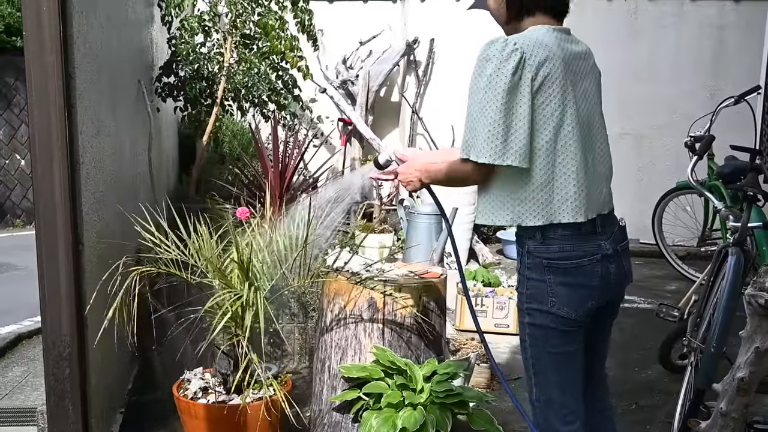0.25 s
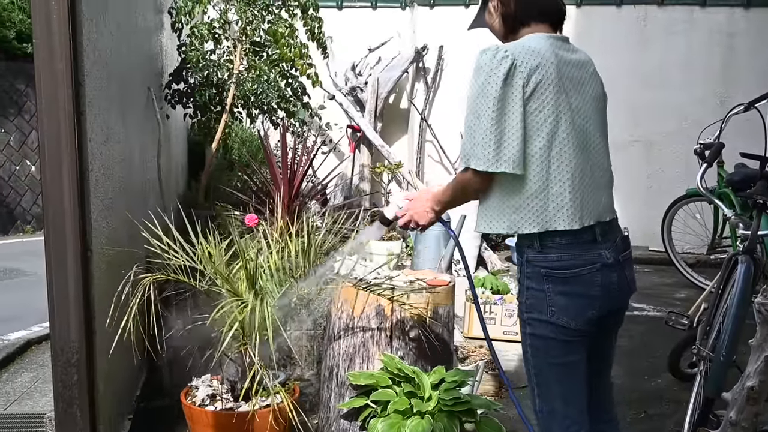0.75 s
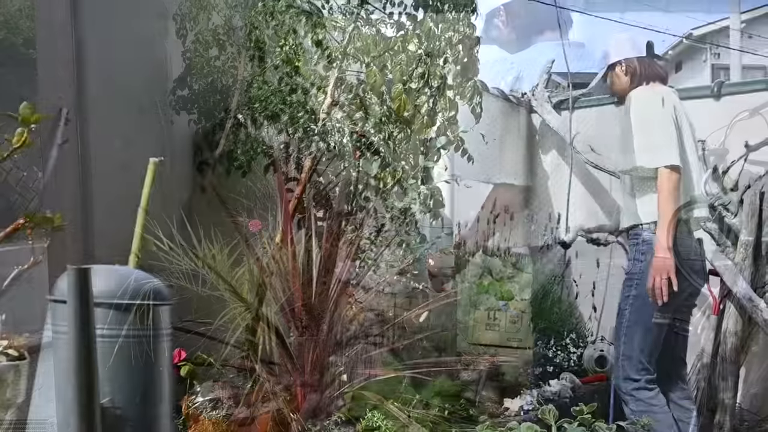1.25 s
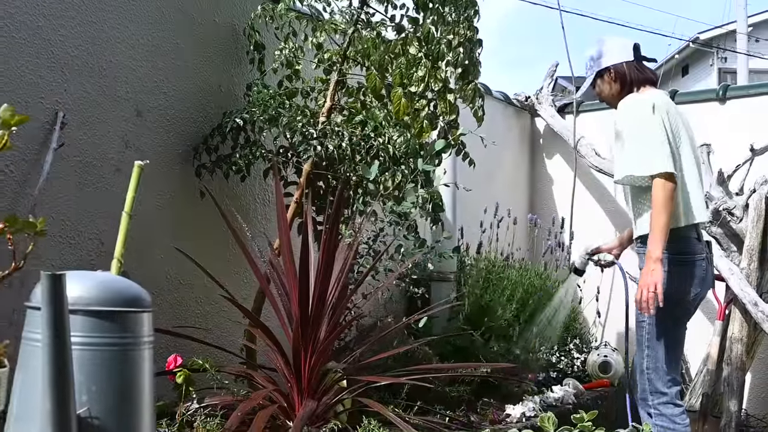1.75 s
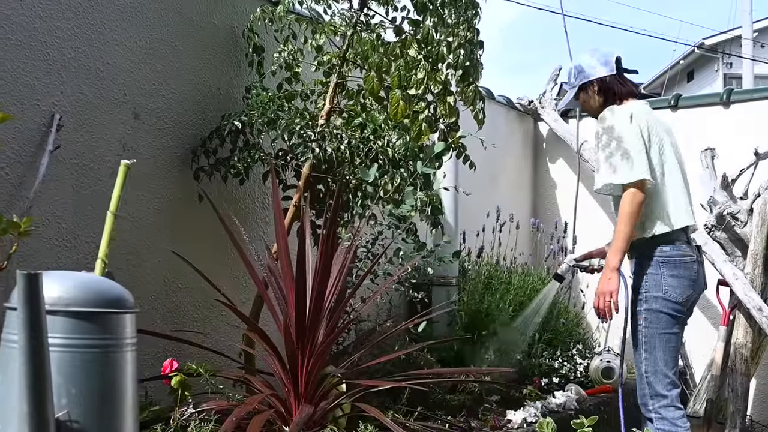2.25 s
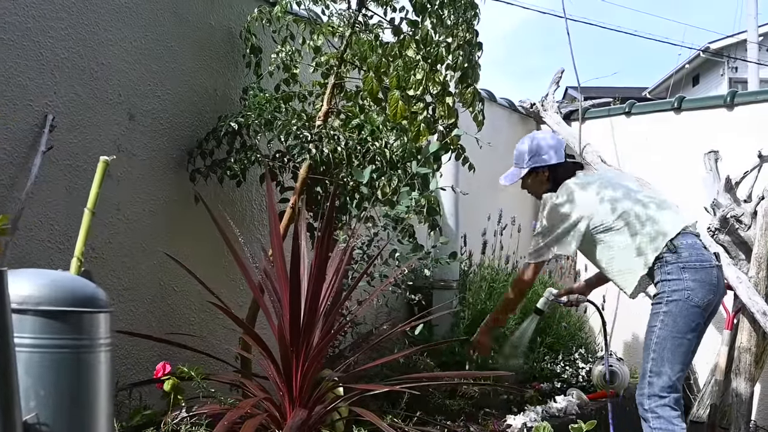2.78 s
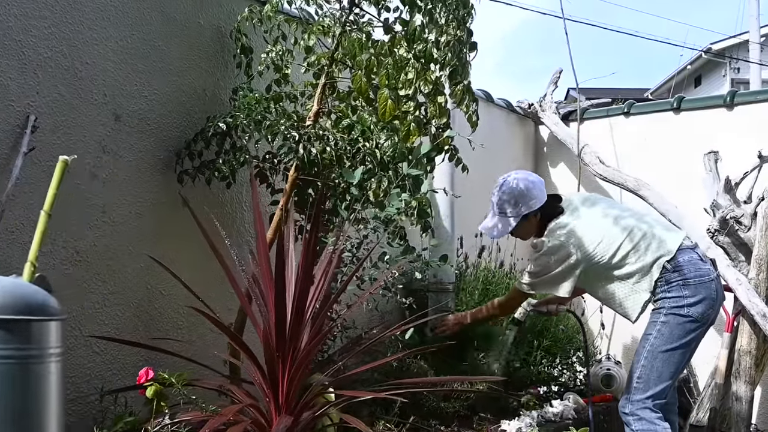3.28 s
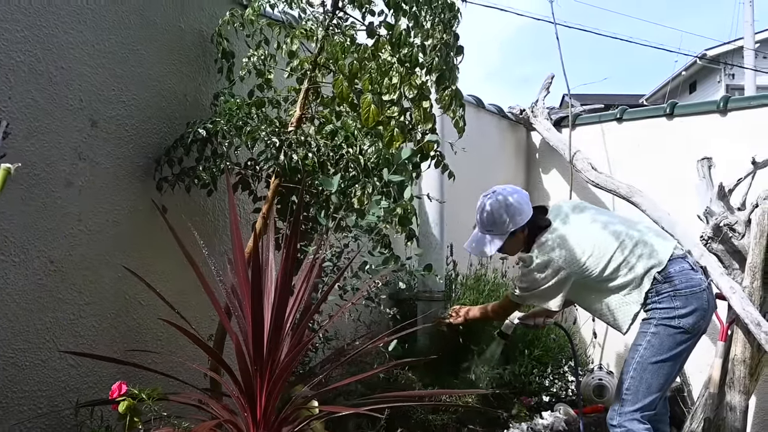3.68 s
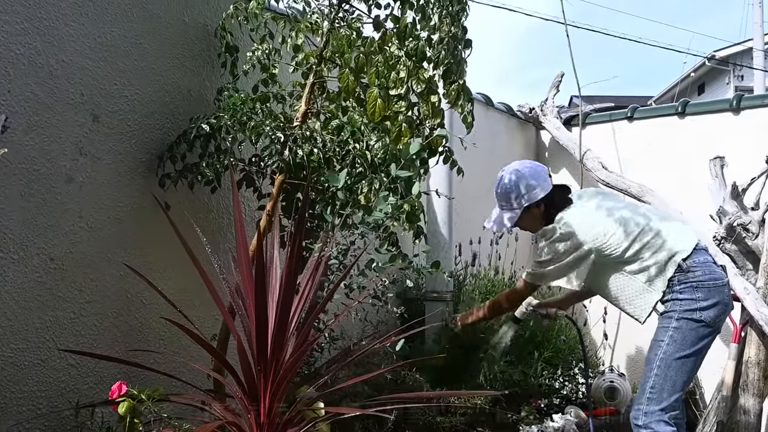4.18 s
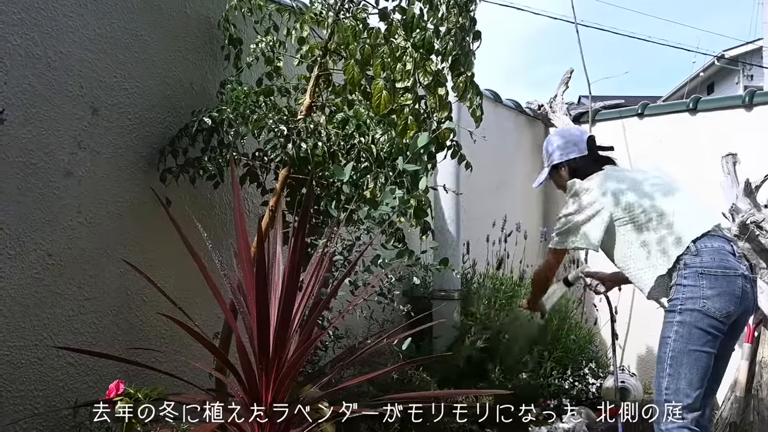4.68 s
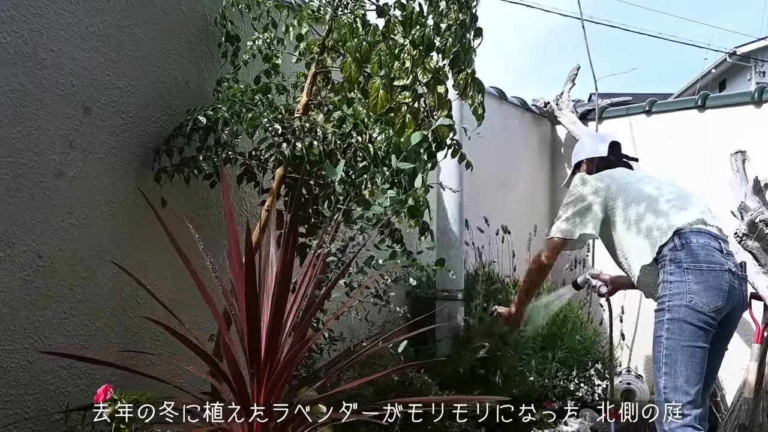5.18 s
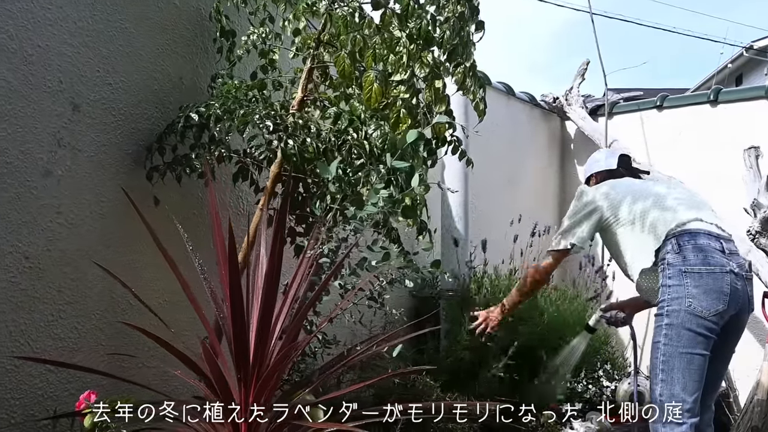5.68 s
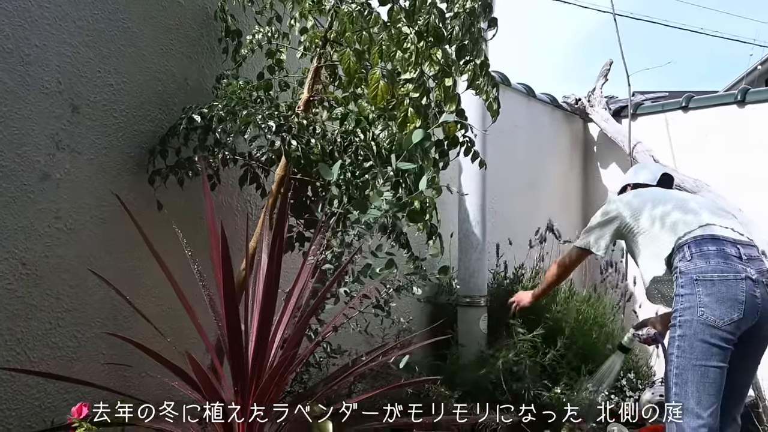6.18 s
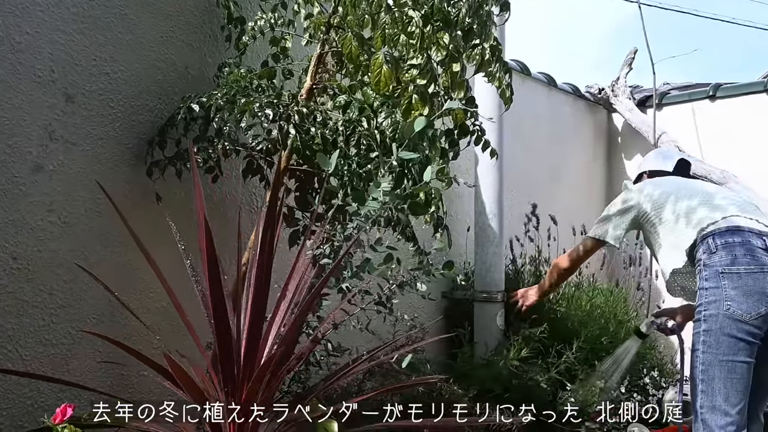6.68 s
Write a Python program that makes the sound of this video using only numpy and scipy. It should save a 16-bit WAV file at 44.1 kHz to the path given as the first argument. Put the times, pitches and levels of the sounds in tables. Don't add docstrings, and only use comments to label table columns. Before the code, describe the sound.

A garden hose sprays leaves and soil with bright, wavering hiss, while the nozzle clicks and sputters and the hose softly bumps a hollow pipe.

```python
import sys
import numpy as np
from scipy import signal
from scipy.fft import rfft, irfft
from scipy.io import wavfile
from scipy.ndimage import uniform_filter1d

SR = 44100
rng = np.random.default_rng(int(sys.argv[2]) if len(sys.argv) > 2 else 0)


def gain_from_decibels(decibels):
    exponent = np.asarray(decibels, float) / 20
    return 10 ** exponent


def generate_wav(signal):
    frames = np.transpose(np.atleast_2d(signal))
    scaled = np.clip(frames, -1, 1) * 32767
    pcm = np.round(scaled).astype(np.int16)
    wavfile.write(sys.argv[1], SR, pcm)


N = 306348
TIME = np.arange(N) / SR
BINS_HZ = np.maximum(np.fft.rfftfreq(N, 1 / SR), 1)

# (frequency [Hz], density [dB per Hz])
SPRAY_COLOUR = [(180, -47), (300, -19), (526, -12), (757, -8), (954, -6), (1570, -5.5), (2150, -4.5),
                (3040, -3.5), (4900, -2), (7920, 0), (10700, -9), (13700, -6.5), (15600, -13)]
# (time [s], level [dB])
SPURT = [
    (.33, -72),
    (.385, -49),
    (.43, -41),
    (.53, -41),
    (.585, -39.5),
    (.605, -45),
    (.63, -67),
]


def unit(x):
    return x / np.sqrt(np.mean(x ** 2))


def curve(rows):
    s, *columns = np.transpose(rows)
    return [np.interp(TIME, s, c) for c in columns]


def colour(points):
    hz, db = np.transpose(points)
    return gain_from_decibels(np.interp(np.log(BINS_HZ), np.log(hz), db))


def shape(x, gain):
    return irfft(rfft(x) * gain, N)


def walk(rate_hz):
    size = int(SR / rate_hz)
    steps = np.repeat(rng.standard_normal(N // size + 1), size)
    steps = uniform_filter1d(uniform_filter1d(steps, size), size)[:N]
    return unit(steps - uniform_filter1d(steps, 3 * size))


def burst(t60_ms, rise_ms=.12):
    ms = np.arange(SR // 8) / SR * 1e3
    envelope = (1 - np.exp(-ms / rise_ms)) * gain_from_decibels(-60 * ms / t60_ms)
    return rng.standard_normal(len(ms)) * envelope / 2


def add(out, s, x):
    i = int(s * SR)
    out[i:i + len(x)] += x[:N - i]


def band(x, hz, width_hz):
    lo = max(hz - width_hz / 2, hz / 4)
    hi = min(hz + width_hz / 2, 20000)
    sos = signal.butter(2, (lo, hi), "band", fs=SR, output="sos")
    return signal.sosfilt(sos, x) * np.sqrt(SR / 2 / (hi - lo))


def layer_levels():
    # (time [s], flow [dB], coarseness of the splash [dB])
    jet = [(0, -40, -8.5), (.2, -46, -5.5), (.76, -46, -6), (.99, -44, -1.5), (1.05, -39.5, 3.5),
           (1.2, -41, 3), (1.5, -46.5, 0.5), (2.5, -45, -1), (2.75, -39.5, -2), (3.22, -42, 4),
           (3.8, -40.5, -1.5), (4.22, -42.5, -4), (4.7, -49.5, 0.5), (4.77, -55, -2), (5.0, -59.5, 1),
           (5.53, -53.5, -4), (5.66, -43.5, -3), (6.95, -40.5, -5)]
    # (middle [s], length [s], change [dB], coarser [dB])
    swings = [(0.65, 0.067, -1.5, 0), (0.847, 0.019, 5, 3), (.9, 0.044, 0, 1), (0.998, 0.037, 3, -7.5),
              (1.424, 0.055, 2.5, -0.5), (1.52, 0.061, -1.5, -2), (1.577, 0.054, 1.5, -1),
              (1.735, 0.068, -5, 0.5), (2.045, 0.095, -5, 0.5), (2.41, 0.12, -2, 0.5), (2.557, .04, 0.5, 3),
              (3.4, 0.093, -2, 1.5), (4.395, 0.2, -2.5, -1.5), (4.58, 0.11, 1.5, 1),
              (4.95, 0.054, -1.5, -0.5), (5.77, 0.154, 0.5, -0.5), (5.992, .05, 0, -1.5),
              (6.47, 0.044, -1, 1.5), (6.69, 0.39, 2, -5.5), (6.833, 0.11, -2, 1.5), (6.921, 0.14, -1, 5)]
    # (level [dB], share of flow, of coarseness, of swings [ratios], lift by the spurt [dB])
    layers = [
        (-56.5, 0.17, 0.34, 0.35, -6),
        (-45, 0.91, 0.92, 1.66, 1),
        (-46.5, 0.93, 0.23, 1.53, 9),
        (-49, 0.72, -0.041, 1, 11),
    ]
    usual_flow_db = -45
    paving_db, paving_until_s, paving_fade_s = 6.5, 1.78, 0.051
    flow, coarse = curve(jet)
    swung = 0
    for s, length_s, db, coarser_db in swings:
        swing = np.exp(-(2 * (TIME - s) / length_s) ** 4)
        swung = swung + db * swing
        coarse = coarse + coarser_db * swing
    air = np.clip((curve(SPURT)[0] + 68) / 30, 0, 1)
    levels = []
    for db, by_flow, by_coarse, by_swing, lift_db in layers:
        level = db + by_flow * (flow - usual_flow_db) + by_coarse * coarse
        levels.append(level + by_swing * swung + lift_db * air)
    levels[0] = levels[0] + paving_db / (1 + np.exp((TIME - paving_until_s) / paving_fade_s))
    return levels


def drops(rate_hz, spread_db, lone, flicker_db, ring_ms):
    chance = rng.random((2, N))
    size = np.minimum(-np.log(1 - chance[1]), 3)
    strikes = (chance[0] < rate_hz / SR) * gain_from_decibels(spread_db * size)
    puffs = signal.lfilter([1], [1, -np.exp(-1e3 / ring_ms / SR)], strikes) * rng.standard_normal(N)
    lone = np.clip(lone, 0, 1)
    blur = rng.standard_normal(N)
    return gain_from_decibels(flicker_db * walk(55)) * (np.sqrt(lone) * unit(puffs) + np.sqrt(1 - lone) * blur)


def spray(levels):
    # (rate [drops/s], size spread [dB], share of lone drops [0-1], flicker [dB], ring [ms])
    drop_sizes = [
        (900, -5, 0.06, 0.5, 3.9),
        (2050, 4.5, 0.24, 0.5, 2.3),
        (3030, 14, 0.14, 0.53, 2.1),
        (4000, 4, 0.17, 0.5, 0.79),
    ]
    edges_hz = (450, 1500, 4000, 10000, 19000)
    shake = gain_from_decibels(0.27 * walk(45))
    out = 0
    for db, size, lo, hi in zip(levels, drop_sizes, edges_hz, edges_hz[1:]):
        window = 1 / np.sqrt((1 + (lo / BINS_HZ) ** 6) * (1 + (BINS_HZ / hi) ** 6))
        out = out + gain_from_decibels(db) * unit(shape(drops(*size), colour(SPRAY_COLOUR) * window))
    return shake * out


def bubbles(splash_db):
    count, low_hz, high_hz, cycles, level_db = 3200, 600, 5920, 24, -9.5
    out = np.zeros(N)
    t = np.arange(1500) / SR
    for when, pitch, big in rng.random((count, 3)):
        hz = low_hz * (high_hz / low_hz) ** pitch
        age = t * hz / cycles
        chirp = np.sin(2 * np.pi * hz * t * (1 + 0.044 * age))
        add(out, when * N / SR, gain_from_decibels(3.7 * big) * np.sqrt(hz) * chirp * age * np.exp(-3 * age))
    return gain_from_decibels(splash_db + level_db) * unit(shape(out, colour(SPRAY_COLOUR)))


def drummed(rows, sharpness):
    out = np.zeros(N)
    for start, end, hz, db in rows:
        size = int((end - start) * SR)
        noise = rng.standard_normal(size + 2000)
        drum = signal.lfilter(*signal.iirpeak(hz, sharpness, SR), noise)[-size:]
        drum = drum / np.abs(signal.hilbert(drum)) ** .4
        add(out, start, gain_from_decibels(db) * unit(drum) * signal.windows.tukey(size, .6))
    return out


def hollow_rings():
    # (from [s], to [s], pitch [Hz], level [dB])
    hollows = [(.42, .44, 2700, -45), (.435, .5, 1980, -44), (.47, 0.577, 2080, -42),
               (.42, .445, 2670, -51.5), (.525, .55, 2680, -46), (0.34, 0.56, 2400, -44.5),
               (.525, .55, 1470, -47), (.588, .612, 950, -48.5), (.618, .636, 870, -52),
               (1.015, 1.028, 1600, -41), (1.03, 1.075, 1610, -38.5), (1.092, 1.118, 2600, -33.5),
               (1.2, 1.41, 2520, -45), (1.3, 1.47, 3770, -48), (1.15, 1.49, 1490, -52),
               (2.9, 2.97, 950, -49.5), (2.92, 2.96, 590, -55), (2.99, 3.015, 1160, -50),
               (2.95, 3.48, 1880, -51), (2.6, 3.4, 2600, -56), (3.15, 3.42, 1075, -53),
               (3.2, 3.397, 535, -61), (3.47, 3.72, 2940, -47.5), (3.44, 3.88, 3170, -50),
               (3.42, 3.8, 2620, -52), (3.43, 3.53, 3550, -50), (3.7, 3.95, 2900, -53),
               (3.75, 4.1, 2250, -57), (3.45, 3.993, 2088, -54), (4.61, 4.63, 1300, -45),
               (4.545, 4.58, 690, -50.5), (4.64, 4.67, 2100, -51), (5.84, 5.92, 1520, -54),
               (5.3, 7, 8000, -54), (5.63, 5.8, 7200, -48.5), (2.255, 2.275, 1900, -52),
               (6.88, 6.94, 2050, -52)]
    return drummed(hollows, 19)


def flat_slaps():
    # (from [s], to [s], centre [Hz], level [dB])
    flats = [(.098, .104, 1400, -39.5), (0.0102, .8, 330, -67), (.752, 1.168, 370, -58),
             (.838, .865, 2900, -45), (.872, .915, 9800, -40.5), (1.02, 1.13, 1900, -39.5),
             (1.01, 1.15, 2750, -42), (1.03, 1.12, 1300, -49), (1.4, 1.445, 250, -56),
             (0.97, 1.93, 294, -66), (1.7, 1.816, 1340, -53.5), (2.27, 2.404, 270, -60),
             (3.1, 3.36, 3100, -43), (1.6, 1.718, 1000, -53), (4.43, 4.53, 1010, -52.5),
             (4.51, 4.57, 1450, -46), (4.57, 4.62, 1500, -50), (.41, 0.616, 2560, -44),
             (4.635, 4.675, 2000, -47), (4.63, 4.67, 900, -50.5), (5.62, 5.9, 4500, -48),
             (2.2, 2.27, 2300, -49), (6.0, 6.35, 4500, -49), (.84, .9, 1540, -49), (6.86, 6.95, 5300, -48)]
    return drummed(flats, 3)


def town_hums():
    # (from [s], to [s], pitch [Hz], level [dB])
    town_lines = [
        (.12, .55, 420, -65),
        (0, .8, 724, -63),
        (0, .95, 1380, -59),
    ]
    return drummed(town_lines, 30)


def spurt():
    # (frequency [Hz], width [Hz], level [dB])
    modes = [(2200, 500, -9), (2700, 150, -10), (3400, 300, -8), (4240, 180, -4), (5270, 130, 5),
             (6050, 200, -2), (6700, 180, -1), (7750, 350, 0), (8770, 220, 0), (9700, 300, -4),
             (10700, 500, -8), (11800, 400, -5), (13000, 800, -6)]
    gain = 0
    for k, (hz, width_hz, db) in enumerate(modes):
        gain = gain + (-1) ** k * gain_from_decibels(db) / (1 + 2j * (BINS_HZ - hz) / width_hz)
    return gain_from_decibels(curve(SPURT)[0] + 1.5 * walk(54)) * unit(shape(rng.standard_normal(N), gain))


def clicks():
    # (time [s], peak [dB], ring [Hz], t60 [ms])
    ticks = [(.001, -28, 5370, 30), (.021, -33, 12500, 10), (0.0325, -19, 5900, 23),
             (0.0328, -17, 7930, 22), (.059, -36, 13500, 10), (0.0745, -26.5, 3800, 8.1),
             (.0752, -27, 8700, 10), (0.077, -28, 5640, 10), (0.098, -25, 8140, 12), (.1, -34.5, 5560, 12),
             (.114, -30, 10500, 12), (.127, -34, 7800, 10), (.162, -34.5, 12900, 10), (.73, -35, 11000, 14),
             (.778, -32, 5980, 14), (0.8053, -27, 10050, 12), (0.8402, -29, 2320, 13),
             (.8415, -32, 7000, 40), (0.843, -29, 2733, 30), (.851, -30, 2200, 30), (.856, -33, 1700, 30),
             (.8745, -22, 9550, 14), (.879, -28, 9000, 20), (.893, -27, 8500, 20), (.942, -29.5, 4750, 16),
             (.9805, -12, 6770, 13), (0.984, -22, 6500, 17), (1.013, -29, 12500, 10), (1.081, -16, 4070, 9),
             (1.0812, -13, 6770, 13), (1.0857, -21, 6220, 9), (1.1229, -15, 2930, 8),
             (1.1237, -15, 4200, 8), (1.1303, -15, 4300, 8.4), (1.136, -22, 4000, 13),
             (1.147, -24, 7160, 10), (1.357, -26, 8200, 25), (1.465, -37, 12200, 30),
             (1.527, -37, 11000, 14), (1.766, -36, 5270, 20), (2.239, -33, 4400, 14),
             (2.468, -39, 2310, 15), (5.081, -43, 2800, 14)]
    ring_db = -7
    echo_s, echo_db = 3e-3, -10
    yard_t60_ms, yard_db = 105, -19
    out = np.zeros(N)
    for s, db, hz, t60_ms in ticks:
        tick = band(burst(t60_ms), hz, 0.44 * hz)
        tick = tick + gain_from_decibels(-2.5) * band(burst(t60_ms / 4), 0.8 * hz, 0.74 * hz)
        ms = np.arange(len(tick)) / SR * 1e3
        note = (1 - np.exp(-ms / 0.23)) * np.sin(2 * np.pi * hz * ms / 1e3)
        tick = tick + gain_from_decibels(ring_db - 60 * ms / t60_ms) * note
        tick = gain_from_decibels(db) * tick / np.max(np.abs(tick))
        add(out, s, tick)
        add(out, s + echo_s, gain_from_decibels(echo_db) * tick)
        add(out, s, gain_from_decibels(db + yard_db) * band(burst(yard_t60_ms, rise_ms=1.9), hz, hz))
    return out


def creaks():
    # (time [s], peak [dB], centre [Hz], t60 [ms])
    cracks = [(.7885, -27, 11000, 40), (.8043, -24, 10500, 25), (.8225, -27, 10500, 25),
              (.864, -31, 12800, 12), (.874, -28, 8500, 14), (.908, -24, 12500, 16), (.917, -31, 12500, 12),
              (.927, -29, 13500, 14), (.932, -30, 12500, 12), (.942, -28, 12500, 14),
              (.949, -29, 12000, 12), (.964, -30, 7000, 22), (.967, -27, 7500, 25), (.97, -26, 7500, 16),
              (.9803, -26, 14000, 25), (1.019, -23, 11500, 21), (1.029, -27, 14000, 12),
              (1.0805, -17, 13500, 14), (1.098, -27, 13000, 12), (1.1295, -29, 13500, 12),
              (1.146, -35, 10000, 11), (.0322, -33, 13000, 14), (.0975, -36, 12500, 10),
              (.0748, -29, 12500, 14), (5.082, -45, 5000, 25), (6.497, -31, 10000, 12),
              (6.498, -32, 4800, 12), (.001, -32, 8500, 30), (1.355, -34, 12000, 14),
              (4.594, -42, 7000, 14)]
    out = np.zeros(N)
    for s, db, hz, t60_ms in cracks:
        crack = band(burst(t60_ms), hz, .7 * hz)
        add(out, s, gain_from_decibels(db) * crack / np.max(np.abs(crack)))
    return out


def bumps():
    # (time [s], scuff [dB], scuff centre [Hz], pipe ring [dB], overtones [dB])
    knocks = [(.839, -32, 1520, -53, -4), (.85, -29, 1520, -58, -5), (0.881, -36, 600, -61, -6),
              (1.31, -40, 750, -62, -7.5), (1.406, -36.5, 855, -61, -11), (2.27, -42, 450, -44, -11),
              (2.304, -33, 1150, -43, -12), (2.325, -37, 1350, -61, -8.5), (2.38, -48, 300, -48, -15),
              (4.53, -41.5, 900, -66, -9), (4.55, -37, 900, -52, -10.5), (4.585, -42, 500, -46, -12),
              (4.668, -45, 425, -45, -17.5), (4.683, -52, 600, -36, 2.5), (4.715, -58, 400, -45, -14),
              (4.7, -52.5, 600, -44, 6), (4.812, -45, 300, -51, -6), (4.929, -58, 250, -47, -10),
              (5.85, -39, 550, -57, 13), (6.499, -43, 600, -67, -12), (6.879, -56, 900, -66, -6)]
    # (frequency [Hz], level [dB], t60 [ms])
    pipe_modes = [(193.6, -7.5, 110), (397, -13, 82), (573, -2, 54)]
    push_ms, scuff_t60_ms, sag_per_s = 5.9, 132, .4
    hold = 1.38
    out = np.zeros(N)
    ms = np.arange(SR // 4) / SR * 1e3
    t = ms / 1e3
    for s, scuff_db, scuff_hz, ring_db, over_db in knocks:
        ring = 0
        for k, (hz, db, t60_ms) in enumerate(pipe_modes):
            fall = gain_from_decibels(db + over_db * (k > 0) - 60 * (ms / t60_ms) ** hold)
            ring = ring + fall * np.sin(2 * np.pi * hz * (s + t * (1 - sag_per_s * t)))
        add(out, s, gain_from_decibels(ring_db) * ring * (1 - np.exp(-(ms / push_ms) ** 2)))
        scuff = band(burst(scuff_t60_ms, rise_ms=5.5), scuff_hz, 1.05 * scuff_hz)
        add(out, s, gain_from_decibels(scuff_db) * scuff)
    return out


def whistle():
    # (time [s], level [dB])
    tap = [(1.2, -85), (2.4, -65), (3.4, -60), (4.05, -60), (4.2, -58), (4.44, -58), (4.5, -73),
           (4.78, -73), (4.84, -62), (5.1, -60), (5.55, -61), (5.66, -67), (5.85, -60), (6.1, -60),
           (6.95, -63)]
    pitch_hz, width_hz = 2154.5, 6
    tone = np.sin(2 * np.pi * np.cumsum(pitch_hz + width_hz * .15 * walk(30)) / SR)
    return np.sqrt(2) * tone * gain_from_decibels(curve(tap)[0] + 1.3 * walk(20))


def town():
    # (frequency [Hz], density [dB per Hz])
    haze = [(12, -34), (24, -21), (145, -15), (181, -9), (394, -5.5), (466, -6), (521, -4.5), (989, -9),
            (1420, -4), (1930, -7), (2100, -5), (2410, -19.5), (15600, -23.5)]
    # (time [s], level [dB])
    engine = [
        (0, -73),
        (.7, -79),
        (.85, -69),
        (1.2, -69),
        (1.4, -91),
        (6.95, -86.5),
    ]
    steady = gain_from_decibels(-56.5 + .5 * walk(3.44)) * unit(shape(rng.standard_normal(N), colour(haze)))
    rumble = unit(band(band(rng.standard_normal(N), 115, 76), 90, 120))
    return steady + gain_from_decibels(curve(engine)[0]) * rumble


def scene():
    levels = layer_levels()
    water = spray(levels) + bubbles(levels[1])
    drummed_on = hollow_rings() + flat_slaps() + town_hums()
    handling = spurt() + clicks() + creaks() + bumps()
    return np.tile(water + drummed_on + handling + whistle() + town(), (2, 1))


def low_pass(x):
    return signal.sosfilt(signal.butter(12, 16860, fs=SR, output="sos"), x)


def record(dry):
    # (time [s], centre [Hz])
    slips = [(.27, 4800), (.27, 6600), (1.74, 8600), (1.92, 10000), (2.27, 10300), (2.97, 14500),
             (3.24, 4800), (3.24, 8300), (3.24, 11700), (3.39, 13800), (3.82, 12500), (4.01, 8300),
             (4.43, 7600), (5.8, 9000), (5.87, 7600), (5.87, 12000), (5.89, 4800), (5.89, 8300),
             (6.35, 6300), (6.47, 5000), (6.47, 7000), (6.61, 5300), (6.61, 9000), (6.73, 13800)]
    slip_db, slip_s, slip_width_hz, top_hz = 1.5, .04, 1600, 15760
    size = int(slip_s * SR)
    side = gain_from_decibels(-84.5) * unit(band(rng.standard_normal(N), 500, 760))
    for s, hz in slips:
        i = int(s * SR)
        near = band(band(dry[0, i:i + size], hz, slip_width_hz), hz, slip_width_hz)
        near = near * slip_width_hz / SR * np.sqrt(2)
        add(side, s - slip_s / 2, gain_from_decibels(slip_db) * near * np.hanning(size))
    mix = dry + side * np.array([[1], [-1]])
    return low_pass(irfft(rfft(mix) * (BINS_HZ < top_hz), N))


dry = scene()
out = record(dry)
generate_wav(out)
```